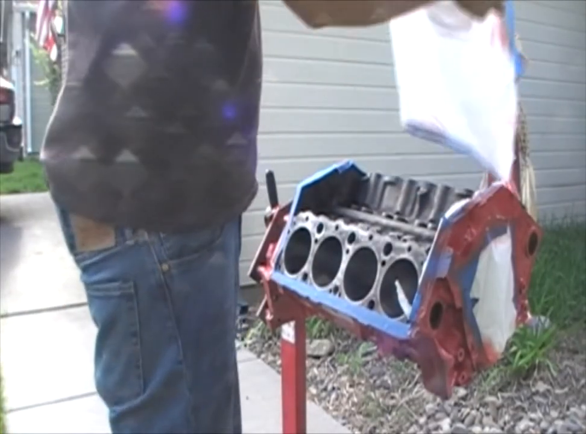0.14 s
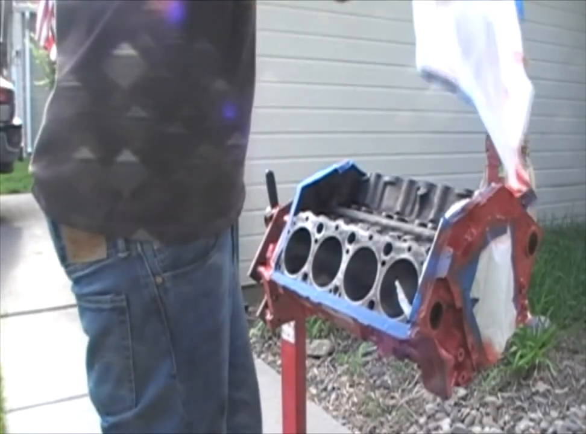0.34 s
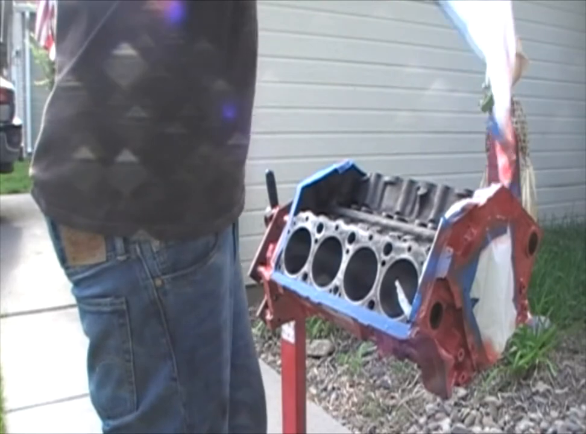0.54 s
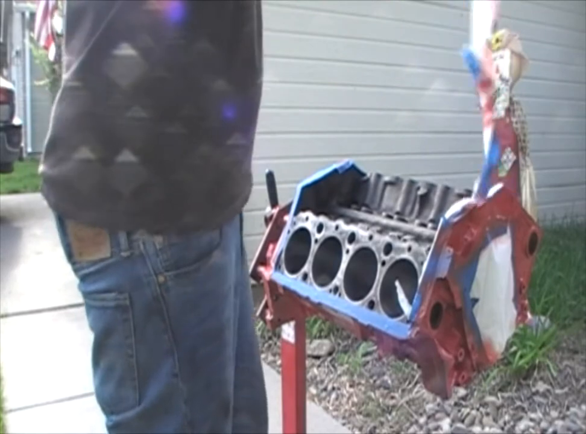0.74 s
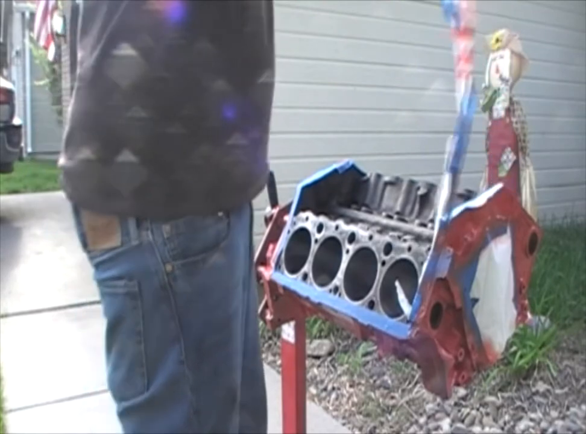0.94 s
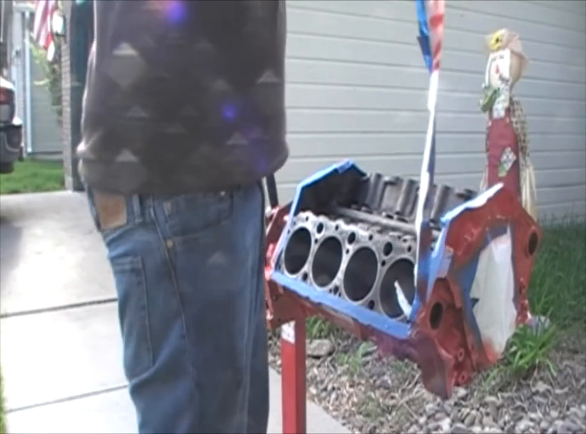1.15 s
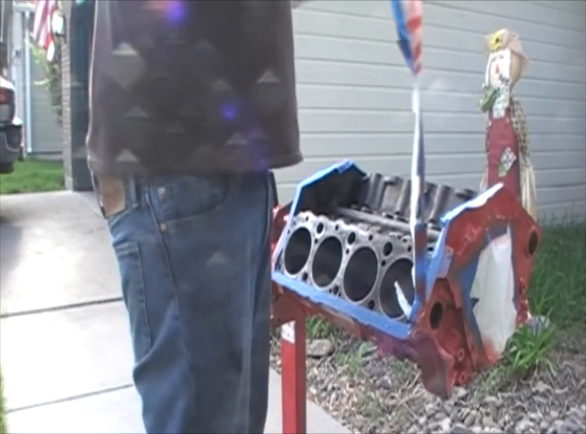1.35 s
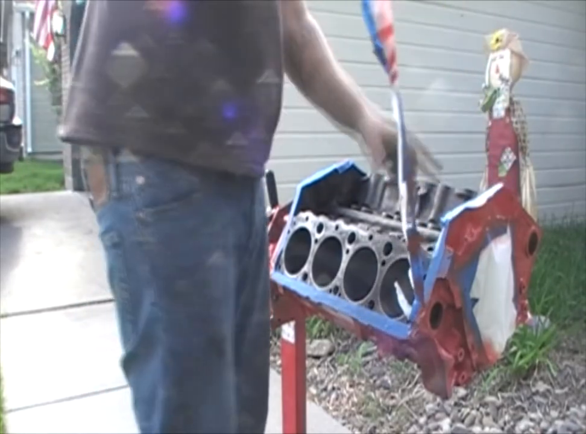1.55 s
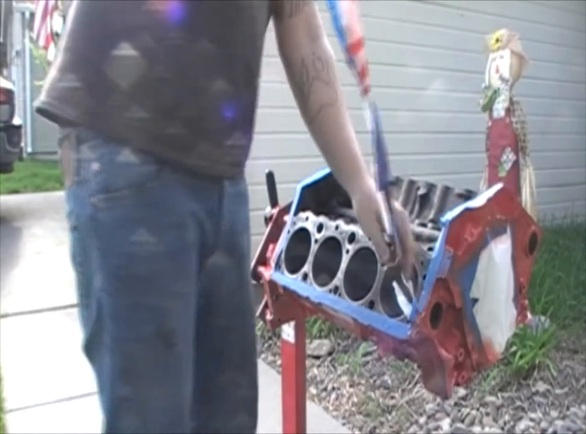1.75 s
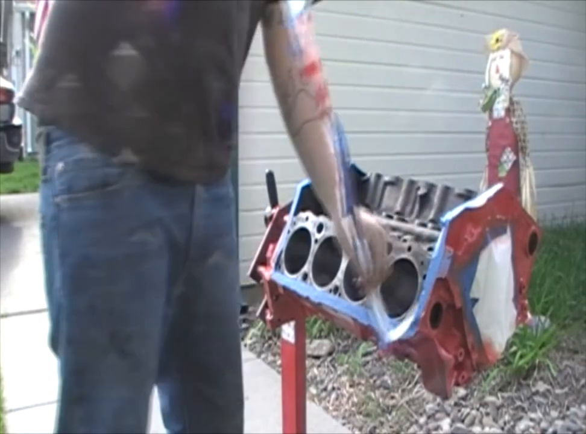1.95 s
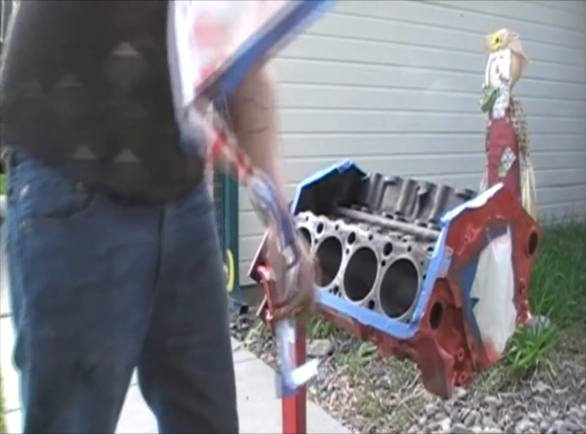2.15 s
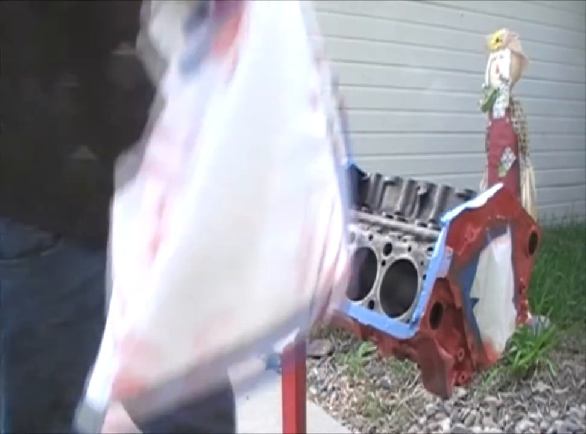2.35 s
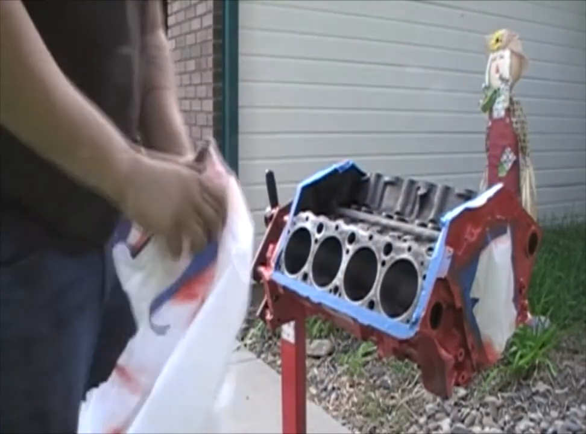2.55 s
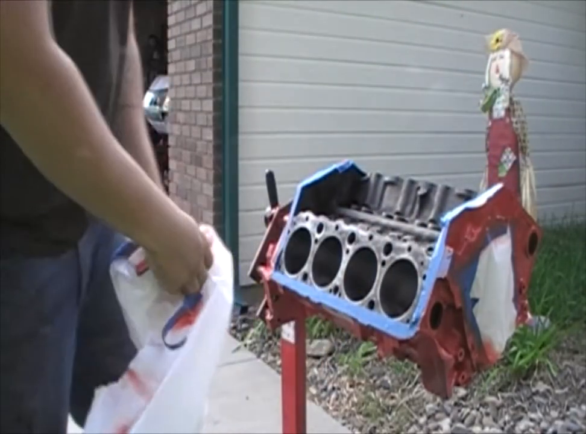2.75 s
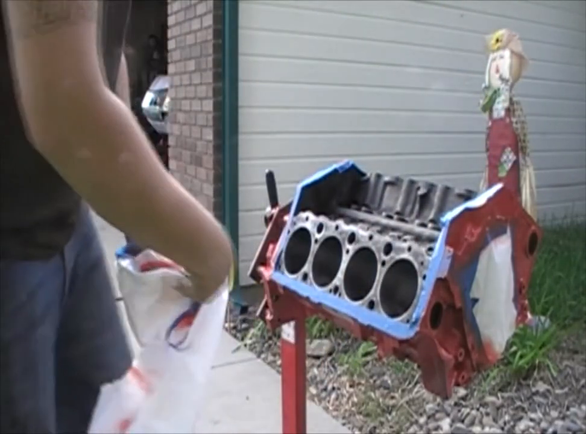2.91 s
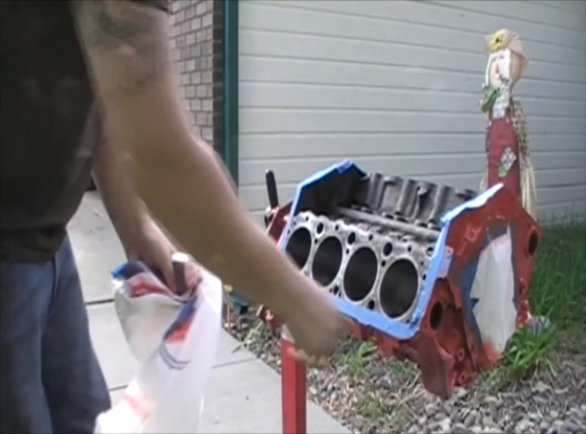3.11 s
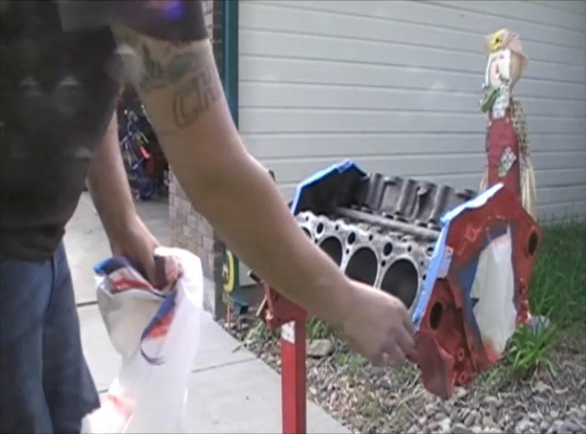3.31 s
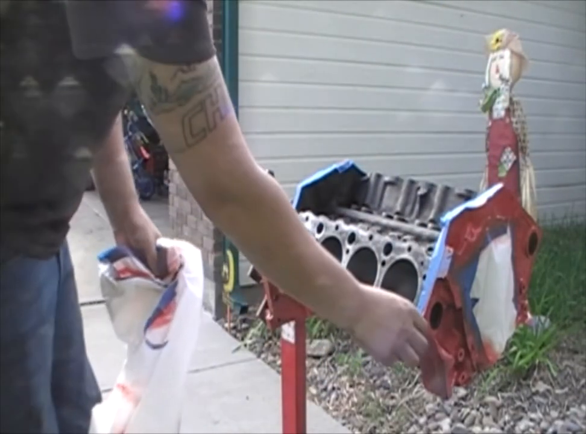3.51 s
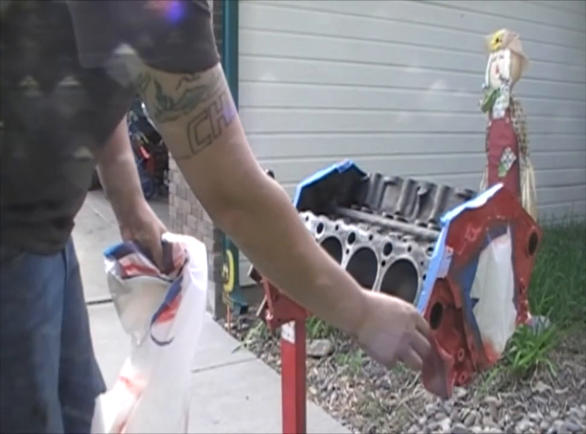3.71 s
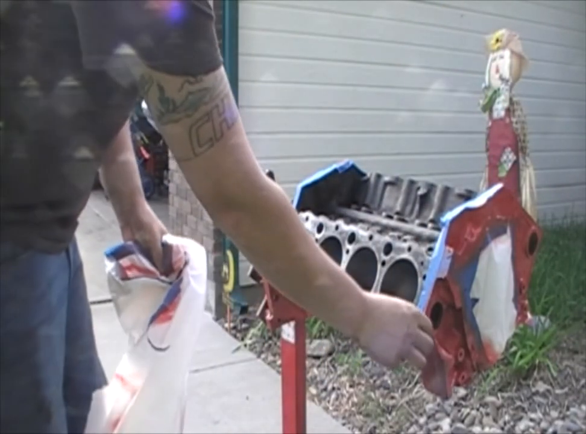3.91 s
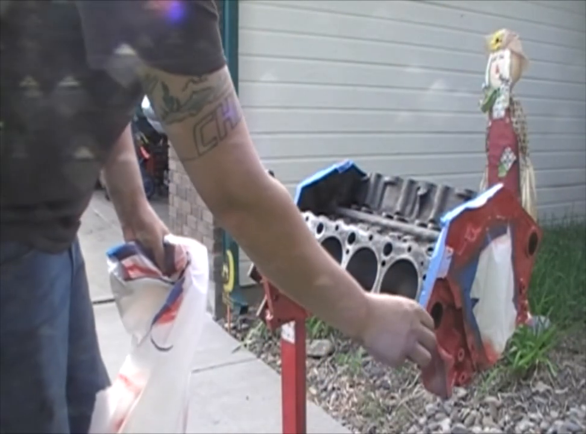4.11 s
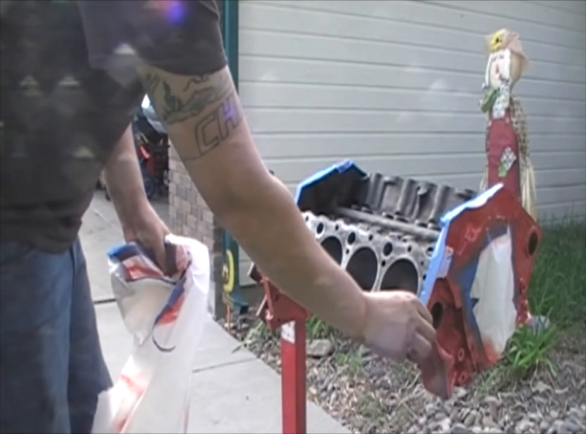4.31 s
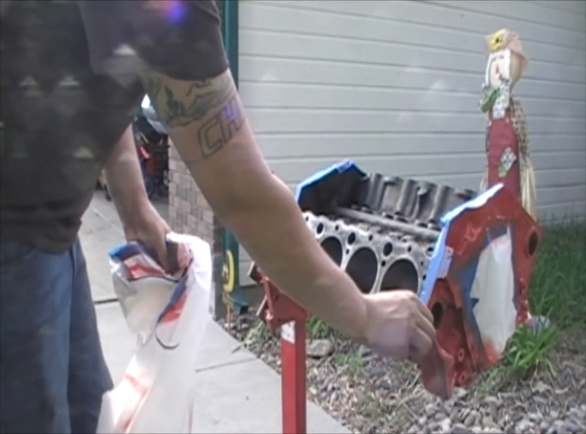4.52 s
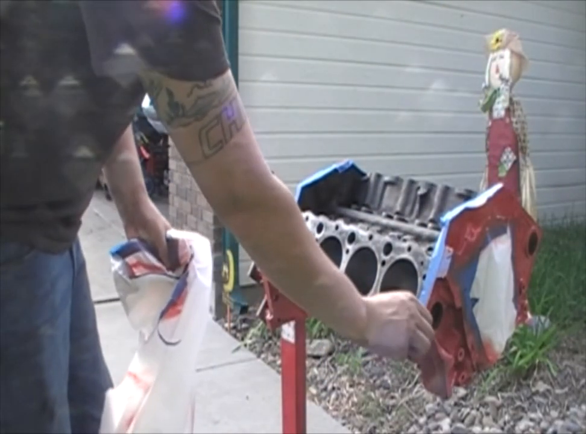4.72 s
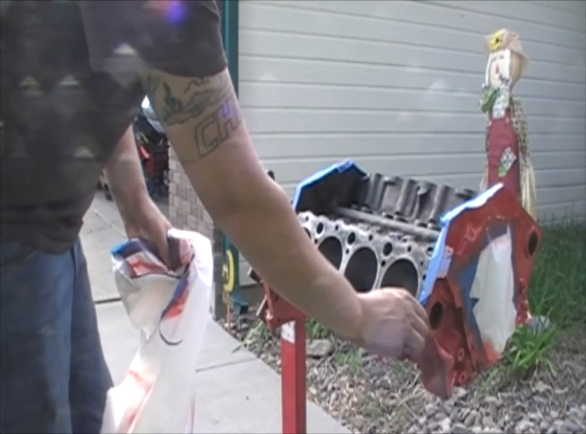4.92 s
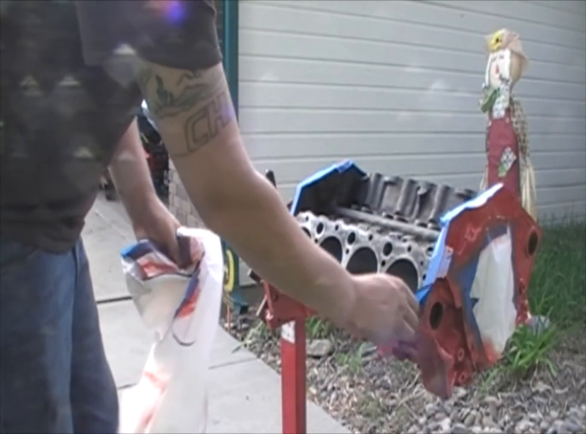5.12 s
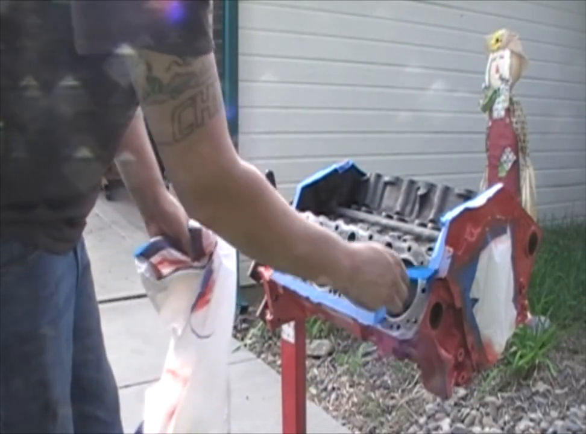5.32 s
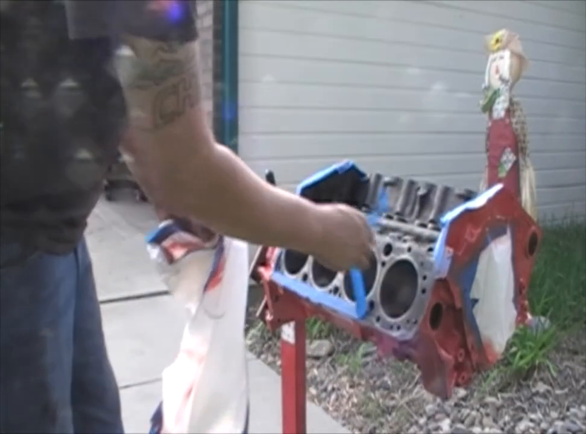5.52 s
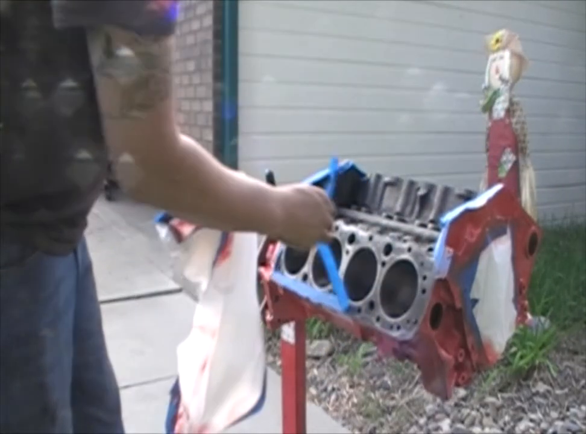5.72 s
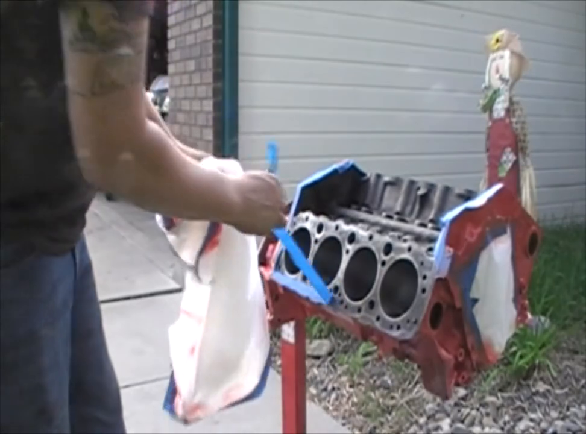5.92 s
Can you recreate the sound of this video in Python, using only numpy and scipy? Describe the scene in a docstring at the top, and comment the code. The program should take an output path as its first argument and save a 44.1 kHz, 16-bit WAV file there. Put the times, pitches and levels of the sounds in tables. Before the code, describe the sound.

Outdoors near a house wall, a large paper sheet is dragged off an engine block with loud, bright crackling. It slackens into softer rustles, then is bunched up in a second strong crunch. Small dry ticks follow as a nail picks at tape, which peels with a thin fizz and rattle. Close stereo microphone, faint traffic behind.

```python
"""First comes a loud paper crackle: masking paper is pulled off an engine block and bunched up by hand.
Every crackle is a random impulse ringing a small piece of paper; large creases add sharp snaps.
Fingernails then flick a tape edge in dry ticks, and the strip peels away as a fizz with a rattle.
The ground and a house wall answer with decaying noise echoes. Behind lie distant traffic (shaped noise)
and a far machine (wavering sine tones and a narrow band of noise)."""
import sys
import numpy as np
from scipy import signal
from scipy.fft import rfft, irfft, next_fast_len
from scipy.io import wavfile
from scipy.ndimage import map_coordinates

SR = 44100
rng = np.random.default_rng(int(sys.argv[2]) if len(sys.argv) > 2 else 0)


def wav_out(sig):
    """Save sig, one row per channel (or a flat mono array), as 16-bit PCM at SR to the path in sys.argv[1]."""
    wavfile.write(sys.argv[1], SR, np.round(np.clip(np.atleast_2d(sig).T, -1, 1) * 32767).astype(np.int16))


N = 267144  # length of the scene [samples]

# How hard the sheet is worked in each hand movement: (time [s], crumple level [dB])
PULL_OFF = [(0.0, -26), (0.064, -29.5), (0.154, -27), (0.44, -33), (0.542, -27), (0.568, -31.5),
            (0.694, -33.5), (0.708, -31), (0.726, -37.5), (0.9, -37), (0.998, -30.5), (1.154, -36),
            (1.3, -53)]
GATHER_IN = [(1.3, -51.5), (1.514, -48), (1.57, -55.5), (1.696, -43.5), (1.706, -47.5), (1.972, -39.5),
             (2.044, -47), (2.166, -42), (2.22, -49)]
BUNCH_UP = [(2.22, -47.5), (2.308, -36.5), (2.422, -35.5), (2.484, -29.5), (2.528, -31), (2.568, -22.5),
            (2.658, -32), (2.734, -28), (2.754, -34.5), (2.91, -33), (3.06, -39.5)]
SETTLE_DOWN = [(3.06, -42.5), (3.18, -42.5), (3.22, -49), (3.349, -43), (3.369, -59.5), (3.419, -42),
               (3.501, -59), (3.69, -56), (3.86, -61)]
GRIP_AGAIN = [(5.981, -53.5), (6.046, -31), (6.058, -38.5)]
# The open sheet is bright and full, the wad duller:
# (time [s], relative fine crinkle level [dB], relative large fold level [dB])
SHEET_COLOUR = [(0.1, 6, -5), (.45, 5, -12), (1.1, 3.5, -9), (1.4, -3.5, -13), (1.8, 4, -7.5),
                (1.92, 3, -13), (2.5, 1.5, -12), (2.8, 0, -12.5), (3.0, 1.5, -10.5), (3.2, -3, -11.5)]
# Large creases snapping: (time [s], relative level [dB])
CREASE_SNAPS = [(0.2814, -5.5), (0.5354, -9), (1.0931, -7.5), (1.3114, -33), (1.3712, -22.5),
                (1.496, -23.5), (1.5514, -29), (1.6757, -21), (1.6835, -18.5), (1.7409, -18), (1.7928, -23),
                (1.8091, -16), (1.8154, -20), (2.0617, -32), (2.125, -23), (2.156, -17), (2.2518, -18.5),
                (2.5596, -9), (2.8558, -12.5), (3.0258, -11), (3.0374, -18), (3.1442, -19.5), (3.1777, -26),
                (3.207, -27), (3.24, -21), (3.3205, -27), (3.3526, -24), (3.3832, -35), (3.3975, -30),
                (3.4278, -29), (3.468, -29), (5.9974, -20)]
# The tape peeling: (time [s], glue fizz level [dB], relative strip rattle level [dB])
TAPE_PEEL = [(4.691, -75, -15), (4.735, -53, -12), (4.88, -55.5, -5), (4.96, -52.5, 0.5), (5.1, -47.5, -6),
             (5.14, -43.5, -2), (5.17, -47, -5.5), (5.22, -43, -3), (5.31, -45, -7), (5.44, -38.5, -6),
             (5.464, -26, -10), (5.482, -44, -8.5), (5.67, -41, -10.5), (5.79, -43.5, -3.5),
             (6.0, -41.5, -8.5)]
# The tape edge flicking off a fingernail or a catch:
# (time [s], relative level [dB], relative body level [dB], body pitch [Hz])
EDGE_FLICKS = [(3.5109, -36, -4.5, 2840), (3.6182, -27.5, -22, 2390), (3.6729, -28, -20, 2060),
               (3.689, -26.5, -20, 2000), (3.7338, -25, -19, 2260), (3.7752, -30.5, -12, 2970),
               (3.8823, -34, -19, 1620), (3.9409, -34.5, -17.5, 1540), (4.1963, -32, -22, 2160),
               (4.3747, -28.5, -11.5, 2330), (4.5623, -33, -26, 2470), (4.6108, -44, -13, 1770),
               (4.7177, -38, -23, 2380), (5.0471, -17, -19.5, 1950), (5.8663, -22.5, -21, 3190)]
# The tape letting go of the engine block with a soft low thump: (time [s], relative level [dB])
TAPE_RELEASES = [(1.68, -43.5)]
# Tone colour of paper and of tape: (frequency [Hz], relative level [dB])
PAPER_COLOUR = [(50, -37), (100, -44), (200, -20), (370, -9.5), (700, -4), (1050, -3), (1650, -1),
                (3200, -2.5), (3900, -6.5), (4500, -2), (5500, -4.5), (8100, 1.5), (9700, -1),
                (13000, -18.5), (15500, -24)]
TAPE_COLOUR = [(300, -20), (500, -16), (800, -13), (1300, -12), (2000, -9.5), (2700, -13), (3400, -11.5),
               (4100, -13), (4700, -8), (5600, -5), (8800, 7.5), (10800, 1.5), (13000, -14), (15800, -15.5)]
# Where the sound comes from: (time [s], bearing [1 = over the engine at right, below 0 = at the hip at left])
HAND_BEARING = [(0, 1.1), (.7, 1.0), (1.8, .5), (2.4, -.35), (3.8, -.45), (4.7, .6), (5.4, .8), (6.05, .25)]
# Phase lead of the right microphone port at bearing 1: (frequency [Hz], lead [radians])
PORT_LEAD = [(1500, .02), (4000, .13), (6500, .25), (8000, .45), (9800, 1.15), (12000, .9), (15000, .3)]
# Level of the right port over the left at bearing 1: (frequency [Hz], difference [dB])
PORT_SHADE = [(2000, -0.34), (4400, 3), (6500, -0.3), (8600, -0.5), (10500, 5.5), (13000, 8), (15000, -3.5)]
# Strength of the near reflections and of the wall's answer: (frequency [Hz], level [dB])
NEAR_ECHO = [(200, -8.5), (1400, -33), (2800, -42.5), (4500, -17.5), (7000, -12), (10000, -8.5),
             (13000, -2), (15000, -18.5)]
WALL_ECHO = [(300, -19.5), (2000, -55), (8000, -30), (14000, -40.5)]
# Tone colour of distant traffic: (frequency [Hz], relative level [dB])
TRAFFIC_COLOUR = [(25, -26), (60, -17), (110, -4), (300, -3), (500, -2), (800, 3), (1200, -4), (1750, -11),
                  (2350, -11), (2750, -15), (5000, -21.5), (8500, -23), (12000, -33), (15000, -49)]
# Tones of the far machine, before they waver: (frequency [Hz], rms level [dB])
MACHINE_HUM = [(151, -74), (216, -74), (238, -70.5)]

HARD_DB = -30  # crumple level at which the sheet counts as worked hard
# Creases: typical body pitch, relative body level, decay of the run of smaller cracks
CREASE_HZ, CREASE_BODY_DB, CREASE_T60_S = 2200, -20.5, .029
# Small creases at random: number a second, base level over the crumple level, widest spread either way
STRAY_PER_S, STRAY_DB, STRAY_SPREAD_DB = 16, 15.5, 5
FLICK_T60_S = .024  # decay of the run of smaller cracks after a flick
TUG_HZ, TUG_T60_S = 300, 0.11  # centre of the thump and decay of the noise that drives it
WHIR_HZ, WHIR_WIDTH_HZ, WHIR_DB = 2420, 98, -72.5  # the thin whir: centre, width, rms level
TOP_HZ = 15850  # upper band limit


def paper():
    """Creases buckle densely when the sheet is worked hard and singly when it is only held."""
    level_db = crumple_db()
    s, *colour = np.transpose(SHEET_COLOUR)
    crinkle_db, fold_db = [np.interp(np.arange(N) / SR, s, column) for column in colour]
    effort = np.clip(amp(level_db - HARD_DB), .01, 2)
    buckles = cracks(400 + 8000 * effort, spread_db=3)
    buckles = buckles * avalanches(rate=150, spread_db=2.0, t60=0.21, share=0.46 / (1 + effort))
    crinkle = amp(crinkle_db - 0.85) * ring(facets(buckles, t60=0.0066), PAPER_COLOUR, 4200, 18000)
    crumple = amp(0.15) * ring(facets(buckles, t60=0.01), PAPER_COLOUR, 1080, 4180)
    # large panels ring lower and longer
    folds = amp(fold_db + 0.16) * ring(facets(buckles, t60=0.017), PAPER_COLOUR, 173, 1040)
    return amp(level_db + wobble(18)) * (crinkle + crumple + folds)


def crumple_db():
    """How hard the sheet is worked: the strongest hand movement at each moment."""
    moves = (PULL_OFF, GATHER_IN, BUNCH_UP, SETTLE_DOWN, GRIP_AGAIN)
    return np.max([curves(move)[0] for move in moves], axis=0)


def snaps(count=120):
    """Large creases flip at set moments; small ones at random, standing out most when the sheet is slack."""
    when, size, pitch = rng.random((3, count))
    times = (np.arange(count) + when) / STRAY_PER_S
    level_db = np.interp(times, np.arange(N) / SR, crumple_db())
    stray_db = level_db + STRAY_DB + STRAY_SPREAD_DB * (2 * size - 1)
    stray_db = stray_db - 4 * amp(level_db - HARD_DB)
    strays = [(s, db) for s, db in zip(times, stray_db) if s < N / SR]
    creases = list(CREASE_SNAPS) + strays
    rows = []
    for (s, db), p in zip(creases, pitch):  # at most count creases sound
        body_hz = CREASE_HZ * 2 ** (.7 * (p - .5))
        rows.append((s, db, CREASE_BODY_DB, body_hz))
    return clicks(rows, CREASE_T60_S, crack_db=-13.0, knock_db=17.5)


def tape():
    """Glue threads part in a fine fizz and shake the taut strip."""
    level_db, strip_db = curves(TAPE_PEEL)
    peeling = np.arange(N) / SR > TAPE_PEEL[0][0]
    bursts = cracks(5000, spread_db=2) * avalanches(rate=120, spread_db=13.5, t60=0.034, share=0.26)
    threads = peeling * bursts
    fizz = amp(-1.7) * ring(facets(threads, t60=.002), TAPE_COLOUR, 4000, 18000)
    strip = amp(strip_db + 2.3) * ring(facets(threads, t60=0.012), TAPE_COLOUR, 380, 4480)
    return amp(level_db) * (fizz + strip)


def flicks():
    """The stiff tape edge springs free with a dry tick."""
    return clicks(EDGE_FLICKS, FLICK_T60_S, crack_db=-14.0, knock_db=20.5)


def clicks(rows, t60, crack_db, knock_db):
    """Each row gives a sharp crack, a short run of smaller ones and a briefly ringing body."""
    edge, body = np.zeros((2, N + SR))
    t = np.arange(SR // 8) / SR
    for s, db, body_db, body_hz in rows:
        run = amp(-60 * t / max(t60, .003) + 1 * rng.standard_normal(len(t)) + 3.0)
        bright, dull = rng.standard_normal((2, len(t)))
        onset = 1 - np.exp(-t / 0.00023)
        crack = bright * (run + amp(-60 * t / 0.0053)) * onset
        mode = np.sin(2 * np.pi * body_hz * t) * amp(-60 * t / 0.0027)
        knock = signal.fftconvolve(dull * (run + amp(-60 * t / 0.0028)), mode)[:len(t)]
        start = round(s * SR)
        edge[start:start + len(t)] += amp(db + crack_db) * crack
        body[start:start + len(t)] += amp(db + body_db + knock_db) * knock / np.linalg.norm(knock)
    return ring(edge[:N], PAPER_COLOUR, 3600, 18000) + ring(body[:N], PAPER_COLOUR, 495, 18000)


def tugs():
    """The tape lets go of the block once, low and brief: fading noise shakes a broad resonance."""
    t = np.arange(N) / SR
    envelope = sum(amp(db - 60 * np.abs(t - s) / TUG_T60_S) * (t > s) for s, db in TAPE_RELEASES)

    def panel(hz):
        """A heavily damped resonance, strongest at TUG_HZ."""
        return 1j * hz * TUG_HZ / (TUG_HZ ** 2 - hz ** 2 + 1j * hz * TUG_HZ)

    rumble = unit(filtered(rng.standard_normal(N), panel))
    return filtered(envelope * rumble, panel)


def flexing(x, depth_db, width_hz, life, size=512):
    """A bending sheet shifts its resonances: patches of gain come and go over about life seconds."""
    hz, t, z = signal.stft(x, SR, nperseg=size)
    position = np.sqrt(hz * 1500) * 2 / width_hz  # patches widen towards the treble
    band, moment = np.meshgrid(position, t / life, indexing="ij")
    field = map_coordinates(rng.standard_normal((128, 512)), [band, moment], mode="wrap")
    gain = amp(depth_db * field)
    gain = gain / np.sqrt(np.mean(gain ** 2, axis=0))
    return signal.istft(z * gain, nperseg=size)[1][:N]


def ports(x, size=256):
    """The bearing of the hands sets lead and shading between two microphone ports, mostly in the treble."""
    hz, t, z = signal.stft(x, SR, nperseg=size)
    side = np.array([-1, 1])[:, None, None]  # left, right
    turn = side / 2 * np.interp(t, *np.transpose(HAND_BEARING))
    shade = amp(turn * along(PORT_SHADE, hz)[:, None])
    lead = np.exp(1j * turn * along(PORT_LEAD, hz)[:, None])
    return signal.istft(z * shade * lead, nperseg=size)[1][:, :N]


def reflections(x, spectrum, t60, count=30):
    """Diffuse echoes as decaying noise, redrawn for each of count stretches as if hands and sheet moved."""
    t = np.arange(SR // 4) / SR
    wet = np.zeros((2, N + len(t)))
    for part in np.array_split(np.arange(N), count):
        tail = rng.standard_normal((2, len(t))) * amp(-60 * t / t60)
        tail = tail / np.linalg.norm(tail, axis=1, keepdims=True)
        echo = signal.fftconvolve(x[None, part], tail, axes=1)
        wet[:, part[0]:part[0] + echo.shape[1]] += echo
    return filtered(wet[:, :N], lambda hz: amp(along(spectrum, hz)))


def outdoors():
    """Distant traffic, nearly alike at both ports, and the wavering hum and thin whir of a far machine."""
    mid, side = filtered(rng.standard_normal((2, N)), lambda hz: amp(along(TRAFFIC_COLOUR, hz)))
    width = [(30, -9), (120, -7.5), (900, -4.5), (8000, -3)]  # (frequency [Hz], left-right part [dB])
    side = filtered(side, lambda hz: amp(along(width, hz)))
    traffic = amp(-54.0 + .5 * wobble(3.33)) * unit(np.array([mid + side, mid - side]))
    hum = np.zeros(N)
    for hz, db in MACHINE_HUM:
        level = amp(db + 1.5 * wobble(3))
        phase = 2 * np.pi * np.cumsum(hz + 2 * wobble(5)) / SR
        hum += level * np.sin(phase)
    whir = filtered(rng.standard_normal(N), lambda hz: 1 / (1 + ((hz - WHIR_HZ) / WHIR_WIDTH_HZ) ** 2))
    return traffic + np.sqrt(2) * hum + amp(WHIR_DB) * unit(whir)  # root 2: sine peak from rms


def cracks(rate, spread_db):
    """Random impulses of unit mean power: rate a second, log-normal sizes."""
    chance = np.clip(rate / SR, 1e-4, 1)
    struck = rng.random(N) < chance
    sizes = amp(spread_db * rng.standard_normal(N))
    return unit(struck * sizes / np.sqrt(chance))


def avalanches(rate, spread_db, t60, share):
    """Gain for buckles that set off their neighbours in bursts that start sharply and die away."""
    t = np.arange(SR // 10) / SR
    power = np.abs(signal.fftconvolve(cracks(rate, spread_db), amp(-60 * t / t60) ** 2)[:N])
    share = np.clip(share, 0, 1)  # the part of the power that comes in bursts
    return np.sqrt(1 - share + share * power / power.mean())


def facets(impulses, t60, count=200, size=1024):
    """Each impulse rings one of many small facets, each with its own brief random response."""
    t = np.arange(size) / SR
    responses = (rng.standard_normal((count, size)) * amp(-60 * t / t60))[:, t < t60]
    responses /= np.linalg.norm(responses, axis=1, keepdims=True)
    at = np.flatnonzero(impulses)
    chosen = rng.integers(count, size=N)[at]
    grains = impulses[at, None] * responses[chosen]
    places = at[:, None] + np.arange(grains.shape[1])
    return np.bincount(places.ravel(), grains.ravel(), N)[:N]  # add up overlapping grains


def ring(x, spectrum, lo_hz, hi_hz, order=8, size=2048):
    """Colour x by the part of a spectrum between two soft edges, with no sound ahead of its cause."""
    hz = np.fft.rfftfreq(size, 1 / SR) + 1
    edges = np.sqrt((1 + (lo_hz / hz) ** order) * (1 + (hz / hi_hz) ** order))
    gain = amp(along(spectrum, hz)) / edges
    # folding the cepstrum gives a minimum-phase pulse
    cepstrum = irfft(np.log(np.maximum(gain, 1e-6)))
    cepstrum[1:size // 2] *= 2
    cepstrum[size // 2 + 1:] = 0
    pulse = irfft(np.exp(rfft(cepstrum)))
    return signal.fftconvolve(x, pulse / np.linalg.norm(pulse))[:N]


def filtered(x, response):
    """Multiply the spectrum of x by a response that depends on frequency."""
    m = next_fast_len(N + SR // 2)
    return irfft(rfft(x, m) * response(np.fft.rfftfreq(m, 1 / SR)), m)[..., :N]


def wobble(rate):
    """A smooth random curve with rate knots a second."""
    knots = rng.standard_normal(int(N * rate / SR) + 4)
    return map_coordinates(knots, [np.arange(N) * rate / SR])


def curves(rows):
    """Per-sample columns of a table; the first, a level, is silent outside its span."""
    s, level, *rest = np.transpose(rows)
    t = np.arange(N) / SR
    silent = -120  # dB
    return [np.interp(t, s, level, silent, silent)] + [np.interp(t, s, column) for column in rest]


def along(points, hz):
    """Read (frequency [Hz], value) points on a log frequency axis."""
    f, v = np.transpose(points)
    return np.interp(np.log(hz + 1), np.log(f + 1), v)


def unit(x):
    """Scale to rms 1."""
    return x / np.sqrt(np.mean(x ** 2) + 1e-20)


def amp(db):
    """Decibels to gain."""
    return 10 ** (np.asarray(db) / 20)


def scene():
    """Paper and tape close by, scattered by engine, body and ground and answered by the wall."""
    sheets = flexing(paper() + tape(), depth_db=1.2, width_hz=248.4, life=.04)
    near = sheets + snaps() + flicks() + tugs()
    scatter = reflections(near, NEAR_ECHO, t60=0.052)
    wall = reflections(near, WALL_ECHO, t60=0.12)
    return ports(near) + scatter + wall + outdoors()


def record(dry):
    """Keep nothing at or above the band limit."""
    return filtered(dry, lambda hz: hz < TOP_HZ)


dry = scene()
out = record(dry)
wav_out(out)
```